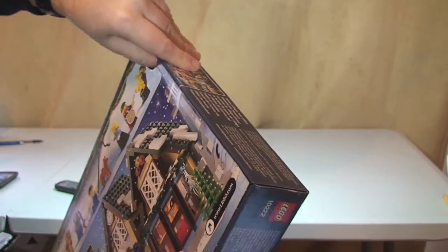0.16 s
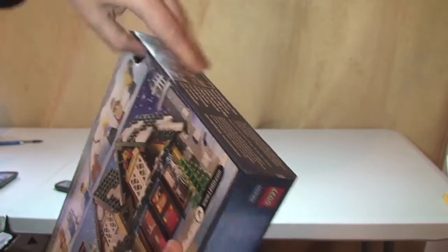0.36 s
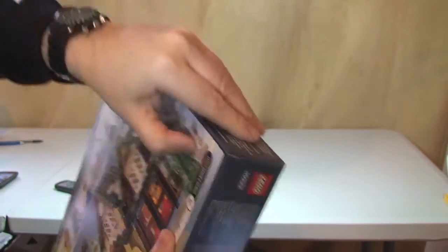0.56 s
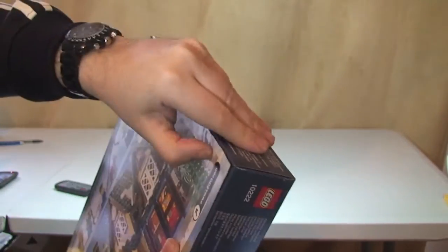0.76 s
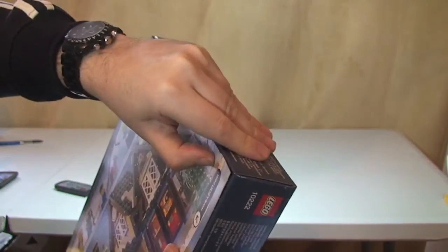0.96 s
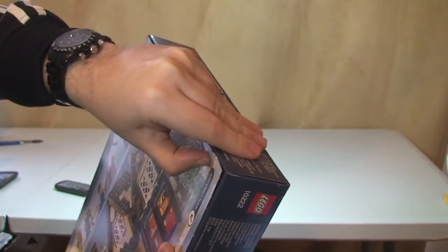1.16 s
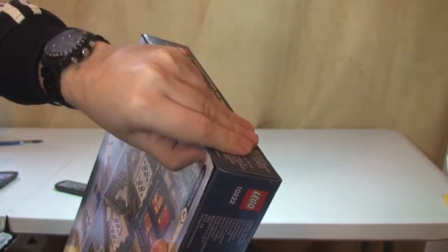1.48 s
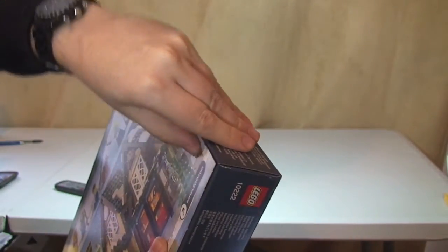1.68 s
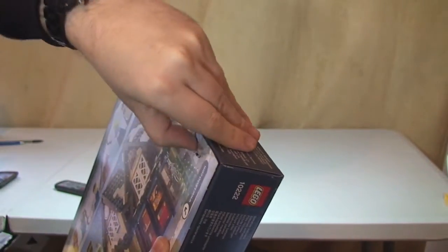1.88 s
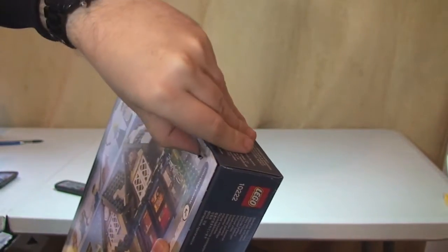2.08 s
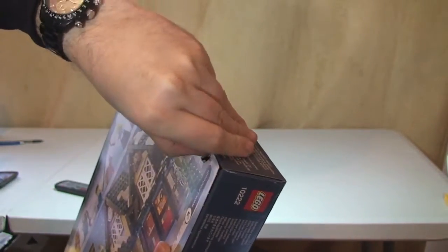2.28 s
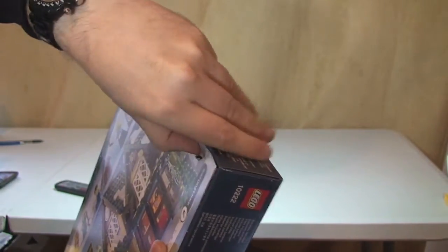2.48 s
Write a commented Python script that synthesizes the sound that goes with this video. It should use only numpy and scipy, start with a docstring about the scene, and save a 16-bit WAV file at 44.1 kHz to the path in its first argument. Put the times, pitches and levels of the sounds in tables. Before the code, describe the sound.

Close stereo pickup of a hollow cardboard box being picked open: stuttering skin rubs and squeaks, bright sharp nail clicks in the middle, another squeak, a boxy knock, light rustling and faint room tone.

```python
"""A short rough skin scrape over rustle opens the scene: fingers work at the glued flap of a glossy box.
Scrapes and squeaks are stick-slip pulse trains through bending card and box modes, with puffs of hiss.
Nail snaps and fingertip taps are noise cracks with a soft push that rings the hollow cardboard.
Handling is dense random ticks; soft slides of fingers on card and low shifts in the grip are swells of
band noise. A small quiet room adds an echo, a decaying tail, room tone and a faint mains hum."""
import sys
import numpy as np
from scipy import signal
from scipy.fft import rfft, irfft
from scipy.io import wavfile
from scipy.ndimage import uniform_filter1d

SR = 44100
rng = np.random.default_rng(int(sys.argv[2]) if len(sys.argv) > 2 else 0)


def pcm_store(signal):
    """Save signal as 16-bit PCM."""
    levels = np.round(np.clip(np.atleast_2d(signal), -1, 1) * 32767)
    wavfile.write(sys.argv[1], SR, levels.astype(np.int16).T)


def boost(x):
    """Linear amplitude factor 10**(x/20) for a level x in decibels (scalar or array-like)."""
    u = np.asarray(x, float) / 20
    return 10 ** u


N = 116865  # length [samples]
EDGE_HZ = 16400  # upper band limit

# resonances of the hollow box: (frequency [Hz], level [dB], t60 [s])
BOX_MODES = [(147, -11, 0.081), (240, 12.5, 0.053), (318, 17.5, 0.069), (385, 12.5, 0.075), (646, 7, 0.057),
             (679, 16.5, 0.029), (738, 2.5, 0.068), (870, -11.5, 0.11), (1093, 8, 0.0085),
             (1440, -4.5, 0.059), (1674, -6.5, 0.039), (2385, 4.5, 0.029), (4070, -13.5, 0.036)]


def evened(x):
    """Normalisation: scales a signal to an rms of 1."""
    return x / np.sqrt(np.mean(x ** 2) + 1e-20)


def read(points, hz):
    """Interpolation on a logarithmic frequency axis."""
    f, value = np.transpose(points)
    return np.interp(np.log(hz + 1), np.log(f + 1), value)


def add(mix, s, sound):
    """Superposition: mixes a sound in from a time in seconds."""
    part = mix[round(s * SR):][:len(sound)]
    part += sound[:len(part)]


def colour(x, table, size=2048):
    """Minimum-phase filtering: the log magnitude fixes the phase, so nothing sounds early."""
    level_db = read(table, abs(np.fft.fftfreq(size, 1 / SR)))
    log_gain = np.log(boost(np.maximum(level_db, -100)))
    taps = np.fft.ifft(np.exp(signal.hilbert(log_gain).conj())).real[:size // 2]
    taps = taps.reshape((1,) * (x.ndim - 1) + (-1,))
    return signal.oaconvolve(x, taps, axes=-1)[..., :x.shape[-1]]


def band(x, lo_hz, hi_hz):
    """Band-pass filtering with Butterworth slopes."""
    return signal.sosfilt(signal.butter(2, [lo_hz, hi_hz], "band", fs=SR, output="sos"), x)


def partly_alike(a, b, same):
    """Partial coherence: the second channel shares the fraction same of the first."""
    return np.array([a, same * a + np.sqrt(1 - same ** 2) * b])


def ring(damping=1):
    """Modal decay: each box mode is a sine dying exponentially, one row each; damping scales its t60."""
    place_db = 2  # each touch finds the modes unevenly
    hz, db, t60 = np.transpose(BOX_MODES)[:, :, None]
    t = np.arange(round(.15 * SR)) / SR
    fall_db = 60 * t / (t60 * damping)
    return boost(db + place_db * rng.standard_normal(hz.shape) - fall_db) * np.sin(2 * np.pi * hz * t)


def drag(rows, uneven, hiss_db):
    """Stick-slip friction: skin sticks and lets go, a click at each slip with a puff of hiss."""
    # colour of one slip: (frequency [Hz], level [dB])
    slip_colour = [(130, -29), (240, -11.5), (320, -0.5), (372, 7), (420, 0), (560, 6.5), (750, -9),
                   (1500, -4), (1950, -4.5), (2400, -17.5), (3400, -12), (4600, -28), (8000, -30.5),
                   (15000, -38)]
    # colour of the skin hiss: (frequency [Hz], level [dB])
    hiss_colour = [(1500, -12.5), (4000, -1), (11300, -11), (16000, -8)]
    wobble, size_db = .45, 4  # spread of slip rate (log) and slip size in a full scrape
    extra_per_s = 1300  # stray slips of neighbouring skin in a full scrape
    flat = .45  # a full scrape is this much flatter in colour than a squeak
    bend_s, bend_hz = .003, 400  # bending waves: low tones lag, by this much at this pitch
    slip_box_db = -9  # box against direct sound
    gate = 0.19  # how far the hiss follows the slips

    s, db, hz = np.transpose(rows)
    t = np.arange(s[0], s[-1] + .1, 1 / SR)
    onset = np.clip((t - s[0]) / 0.00069, 0, 1)
    release = np.clip((s[-1] - t) / 0.0065, 0, 1)
    pressure = onset * release * boost(np.interp(t, s, db))

    rate_noise, size_noise, hiss_noise, sign_noise = rng.standard_normal((len(t), 4)).T
    drift = evened(uniform_filter1d(rate_noise, size=120))
    turns = np.cumsum(np.interp(t, s, hz) * np.exp(wobble * uneven * drift)) / SR
    regular = np.diff(np.floor(turns), prepend=0)  # one slip at each whole turn
    stray = np.sign(sign_noise) * (rng.random(len(t)) < extra_per_s * uneven ** 2 / SR)
    slips = (regular + stray) * boost(size_db * uneven * size_noise) * pressure

    # dispersion: the phase whose group delay falls as one over the root of frequency
    lag = 2 * bend_s * np.sqrt(bend_hz * np.fft.rfftfreq(len(t), 1 / SR))
    slips = irfft(rfft(slips) * np.exp(-2j * np.pi * lag), len(t))
    direct = colour(slips, [(f, g * (1 - flat * uneven)) for f, g in slip_colour])

    # the pressing finger shortens the ring; the two lowest modes stay out
    pressed_ring = np.diff(ring(damping=.45)[2:].sum(0))
    box = signal.oaconvolve(slips, pressed_ring)[:len(t)]
    box *= boost(slip_box_db) * np.std(direct) / np.std(box)

    # the direct sound from 900 to 5000 Hz carries the pressure level
    scale = np.sqrt(np.mean(pressure ** 2) / np.mean(band(direct, 900, 5000) ** 2))
    puffs = hiss_noise * (1 - gate + gate * 3 * np.exp(-4 * (turns % 1)))
    hiss = evened(colour(puffs, hiss_colour)) * pressure * boost(hiss_db)
    return s[0], scale * (direct + box) + hiss


def handling():
    """Shot noise: hands shifting lightly make dense random ticks of skin on card."""
    # course of the rustle: (time [s], level [dB])
    touch = [(0, -41.5), (.13, -59.5), (0.159, -48.5), (.42, -53), (0.819, -58.5), (1.25, -54),
             (1.35, -59.5), (1.46, -48.5), (1.67, -44.5), (1.86, -54.5), (2.031, -57), (2.22, -52),
             (2.43, -48), (2.65, -59)]
    # colour of the rustle: (frequency [Hz], level [dB])
    rustle_colour = [(100, -11), (320, -4), (800, -5.5), (2000, -16), (5000, -25), (15000, -30.5)]
    grains_per_s, grain_db = 3000, 3  # mean tick rate, spread of tick size
    sizes = boost(grain_db * np.minimum(rng.exponential(1, N), 5))
    ticks = sizes * (rng.random(N) < grains_per_s / SR) * rng.choice([-1., 1.], N)
    level_db = np.interp(np.arange(N) / SR, *np.transpose(touch))
    return evened(colour(ticks, rustle_colour)) * boost(level_db)


def room_tone():
    """Partly coherent noise: coloured room tone in two channels, with a faint mains hum in both."""
    # colour of the room tone: (frequency [Hz], level [dB])
    tone_colour = [(15, -43), (25, 8.5), (256, -32), (363, -27), (451, -6), (659, -6.5), (1020, -8),
                   (1610, -11), (11900, -22), (16000, -15)]
    # left-right coherence: (frequency [Hz], likeness [0 to 1])
    likeness = [(30, 0.12), (100, 0.89), (400, 0.093), (8000, 0.22), (13000, 1)]
    tone_db, hum_db, hum_hz = -53, -68.5, 100
    a, b = rfft(rng.standard_normal((2, N)))
    same = np.clip(read(likeness, np.fft.rfftfreq(N, 1 / SR)), 0, 1)
    pair = irfft(partly_alike(a, b, same), N)
    tone = boost(tone_db) * evened(colour(pair, tone_colour, size=8192))
    hum = boost(hum_db) * np.sin(2 * np.pi * hum_hz * np.arange(N) / SR)
    return tone + hum


def snap(s, crack_db, treble_db, thump_db, ring_db):
    """Impulsive excitation: a broadband crack, a crackle of fibres, and a push that rings the box."""
    crack_s = .002  # the crack falls 20 dB in this time
    tear_s, tear_db = 0.015, -15  # fibres crackle on: time to fall 20 dB, start against the crack
    contact_s = 0.0009  # contact time of the soft push
    split_hz = 440  # thump modes lie below, ringing modes above

    modes = ring()
    modes[1:4:2] *= -1  # neighbouring low modes move in opposite sense
    t = np.arange(modes.shape[1]) / SR
    fall = boost(-20 * t / crack_s) + boost(tear_db - 20 * t / tear_s)
    spectrum = rfft(rng.standard_normal(len(t)) * fall)
    smooth = np.sqrt(uniform_filter1d(abs(spectrum) ** 2, size=45))
    burst = irfft(spectrum / smooth, len(t)) * (t < .05)  # levelled spectrum

    push = np.hanning(max(round(contact_s * SR), 3))
    low = np.array(BOX_MODES)[:, 0] < split_hz
    crack = band(burst, 596, 5570)
    treble = band(burst, 3780, 11500)
    thump = signal.oaconvolve(modes[low].sum(0), push)[:len(t)]
    box_ring = band(modes[~low].sum(0), split_hz, EDGE_HZ)

    parts = [(0, crack), (treble_db, treble), (thump_db + 10.5, thump), (ring_db + 3.5, box_ring)]
    # equal energy for every part before its level
    return s, sum(boost(crack_db + db) * 10 * p / np.linalg.norm(p) for db, p in parts)


def soft_swell(s, length_s, db, hz):
    """Friction noise: a soft finger slide on card, or a low shift in the grip, as a swell of band noise."""
    size = round(length_s * SR)
    noise = band(rng.standard_normal(4 * SR // 10), hz * 0.71, hz * 1.1)[-size:]
    return s, boost(db) * np.hanning(size) ** .5 * evened(noise)


def room(direct, wet):
    """Reverberation: direct sound, an early echo, then a dense tail dying band by band."""
    # early reflections: (time [s], left level [dB], right level [dB])
    reflections = [(.0064, -13.5, -10)]
    # decay of the tail: (frequency [Hz], t60 [s])
    decay = [(300, 0.15), (2500, 0.21), (7000, 0.2), (14000, 0.14)]
    tail_db, same, start_s = -6.5, 0.92, 0.0055  # left tail level, coherence, middle of the fade-in
    a, b = rng.standard_normal((2, SR // 2))
    hz, t, z = signal.stft(partly_alike(a, b, same), SR, nperseg=256)
    tail = signal.istft(z * boost(-60 * t / read(decay, hz)[:, None]), SR, nperseg=256)[1]
    tail *= np.clip(np.arange(tail.shape[1]) / SR / start_s - .5, 0, 1)
    tail *= boost(tail_db) / np.linalg.norm(tail[0])
    for s, left_db, right_db in reflections:
        tail[:, round(s * SR)] += boost(np.array([left_db, right_db]))
    return direct + signal.fftconvolve(wet[None], tail, axes=1)[:, :N]


def scene():
    """Superposition of all touches on the box, heard in the room over its tone."""
    # skin drags, one list each: (time [s], pressure level [dB], slip rate [Hz])
    drags = [
        [(0, -38.5, 329), (.02, -63.5, 331), (.045, -69, 317)],
        [(.178, -38.5, 289), (.19, -36.5, 290.1), (.216, -34, 253.9), (.26, -34.5, 262.7), (.285, -46, 219),
         (.3, -41, 217)],
        [(.315, -51, 240), (.33, -44, 246.7), (.346, -31, 249.4), (.36, -46, 259), (.395, -53, 255)],
        [(.547, -39.5, 408.5), (.568, -37, 382.3), (.578, -36.5, 296.7), (.6, -38.5, 299), (.612, -42, 300),
         (.635, -50, 322)],
        [(.665, -40, 302), (.676, -43, 316.7), (.69, -39.5, 352.8), (.704, -36, 356), (.745, -62.5, 380)],
        [(.85, -36, 369), (.86, -39, 394.3), (.878, -37, 482.7), (.898, -39.5, 464), (.926, -38.5, 416),
         (.937, -34.5, 367), (.96, -39, 365.4), (.972, -28, 356)],
        [(.972, -38.5, 328.4), (1.0, -38, 281), (1.012, -32.5, 360.3), (1.026, -38.5, 483), (1.035, -38, 526),
         (1.043, -38, 478), (1.052, -44.5, 374), (1.062, -35, 360), (1.072, -56, 370)],
        [(1.69, -56, 331.7), (1.726, -44.5, 312), (1.74, -39.5, 299), (1.752, -41, 319), (1.768, -36, 413.6),
         (1.788, -37.5, 370.5), (1.798, -45, 387), (1.812, -74, 402)],
        [(2.06, -50, 326), (2.068, -39.5, 342.6), (2.088, -39, 367), (2.1, -39, 407), (2.115, -39, 404.4),
         (2.136, -37.5, 347.4), (2.148, -39.5, 389), (2.164, -35.5, 357), (2.178, -52.5, 363),
         (2.195, -45, 344)],
        [(2.495, -65, 300), (2.512, -42.5, 300), (2.525, -46.5, 300), (2.538, -40.5, 294.6), (2.57, -65, 291)],
    ]
    # one per drag: (unevenness [0 clean squeak to 1 scrape])
    unevenness = [.8, .6, .9, .8, .25, .04, .22, .12, .035, .8]
    # one per drag: (skin hiss against pressure [dB])
    hiss_levels = [-12, -5, -9, -1.5, -0.5, 1.5, 0.5, -5, -0.5, -10]
    # nail snaps and taps: (time [s], crack level [dB], then treble [dB], low thump [dB] and
    # box ring [dB] against the crack; snap() raises the last two by fixed offsets)
    snaps = [(0.323, -52, -20, 0, 15.5), (0.4218, -52.5, -21, -26, 6.5), (0.444, -55, -17, -18, 10),
             (0.7501, -35, -34, -13, -16), (0.7854, -53.5, -28, -28, 7), (1.1105, -15, -0.5, -28, -6),
             (1.1745, -21.5, -3.5, -25, -1), (1.3884, -13, 2, -27, -11), (1.4784, -29.5, 0, -2.5, -2.5),
             (1.4849, -10, -4, -18.5, -4), (1.6163, -31, -8, -4, 3), (1.9146, -42, -4, -8.5, -5.5),
             (1.9718, -42.5, -12, -19, -8.5), (2.2389, -28, 2.5, 3.5, 2), (2.2436, -16.5, -9, -2.5, 7),
             (2.271, -46, -12, 10.5, 15), (2.373, -38.5, -38, -11.5, 3.5)]
    # soft slides of fingers on card and low shifts in the grip:
    # (time [s], length [s], level [dB], band frequency [Hz])
    soft_moves = [(.478, 0.06, -53, 130), (0.45, 0.079, -49, 930), (0.47, 0.13, -46, 1960),
                  (1.949, 0.034, -53, 192)]
    radiate_hz = 132  # the small box sends out little below this
    drag_wet_db = -7  # the pressing finger keeps the drags drier

    box, skin, swells = handling(), np.zeros(N), np.zeros(N)
    for row in zip(drags, unevenness, hiss_levels):
        add(skin, *drag(*row))
    for row in snaps:
        add(box, *snap(*row))
    for row in soft_moves:
        add(swells, *soft_swell(*row))
    high_pass = signal.butter(4, radiate_hz, "high", fs=SR, output="sos")
    box, skin = signal.sosfilt(high_pass, [box, skin])
    box = box + swells
    return room(box + skin, box + boost(drag_wet_db) * skin) + room_tone()


def band_limit(x):
    """A steep low-pass at the top of the band."""
    return signal.sosfilt(signal.butter(12, 16550, fs=SR, output="sos"), x)


def record(dry):
    """Transducer response: the microphone pair leans left in the mids and is band-limited."""
    # channel balance: (frequency [Hz], left minus right [dB])
    balance = [(60, -1.5), (240, 1), (950, 4), (3770, 1), (7500, 1.5), (15000, -2)]
    # microphone response: (frequency [Hz], level [dB])
    response = [(30, -17), (60, 2.5), (12500, -5.5), (16000, -18)]
    left = colour(dry[0], [(hz, db / 2) for hz, db in balance])
    right = colour(dry[1], [(hz, -db / 2) for hz, db in balance])
    pair = colour(np.array([left, right]), response, size=4096)
    low_pass = signal.firwin(255, EDGE_HZ, window=("kaiser", 9), fs=SR)
    pair = signal.oaconvolve(pair, low_pass[None], "same")
    return band_limit(pair)


dry = scene()
out = record(dry)
pcm_store(out)
```